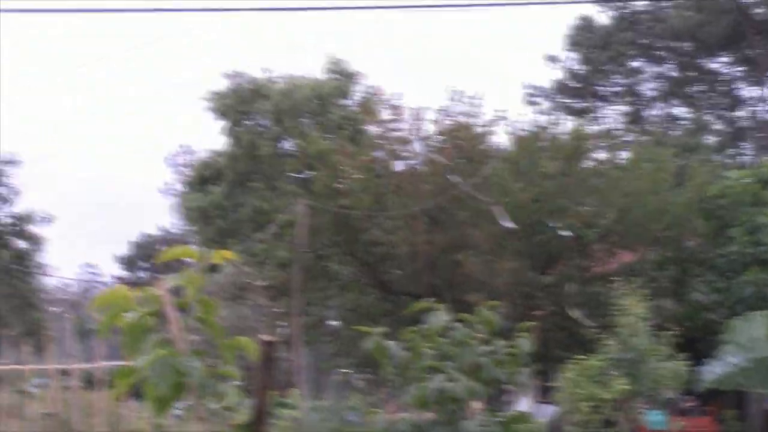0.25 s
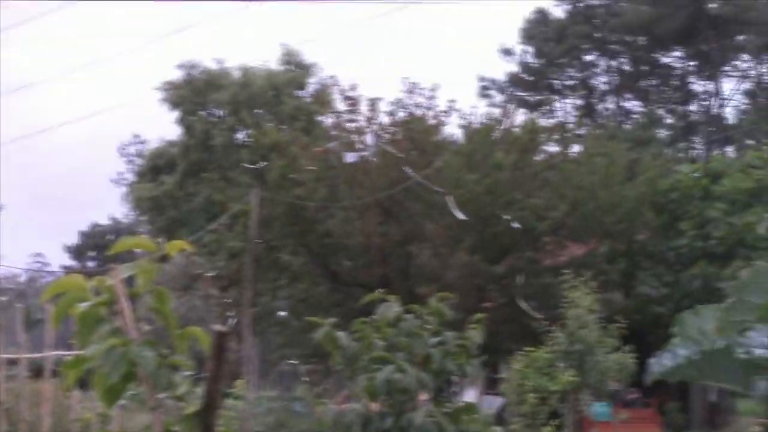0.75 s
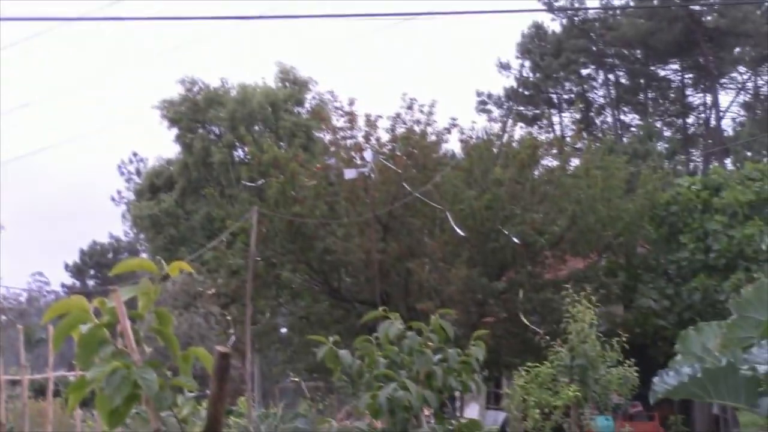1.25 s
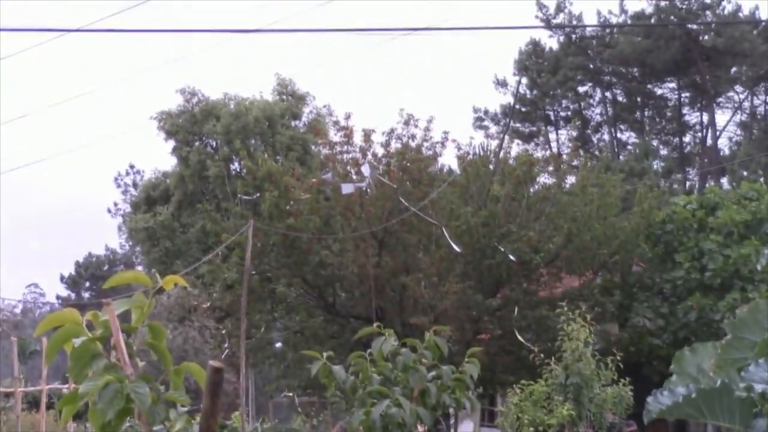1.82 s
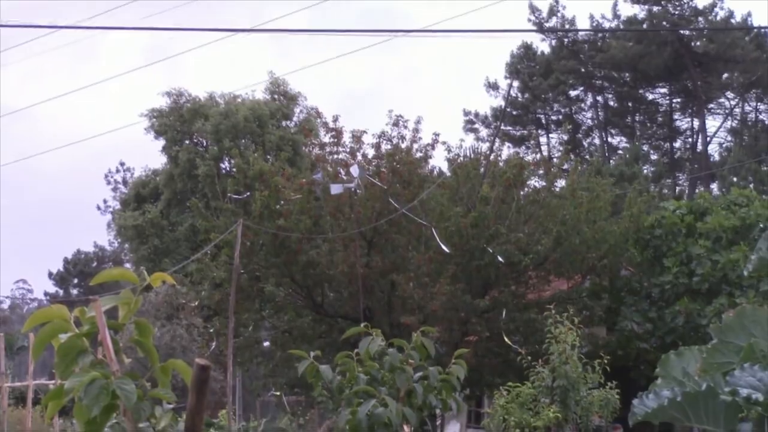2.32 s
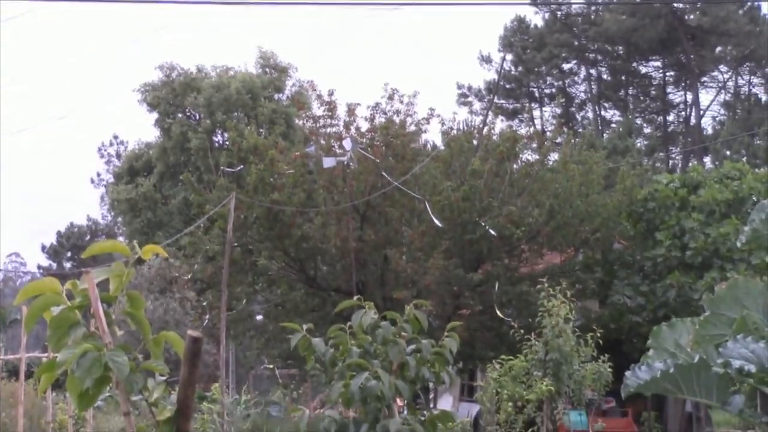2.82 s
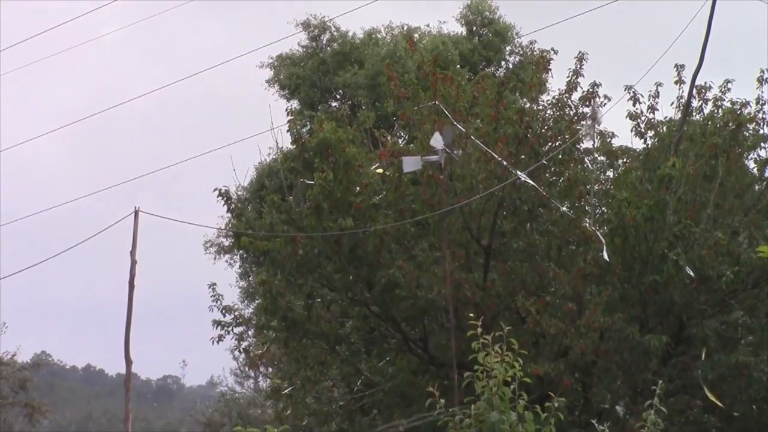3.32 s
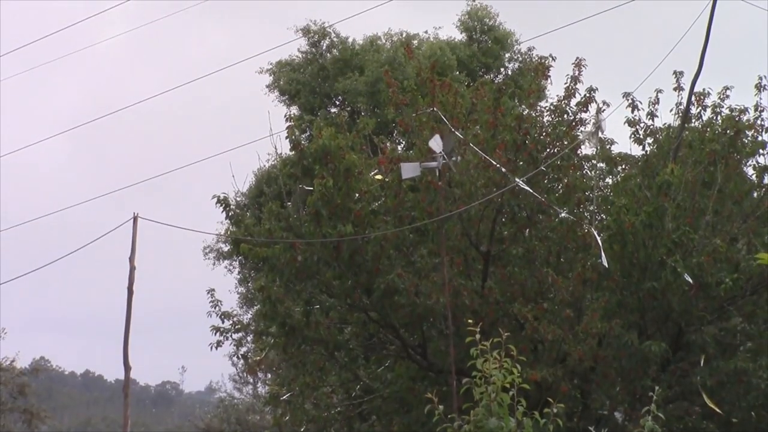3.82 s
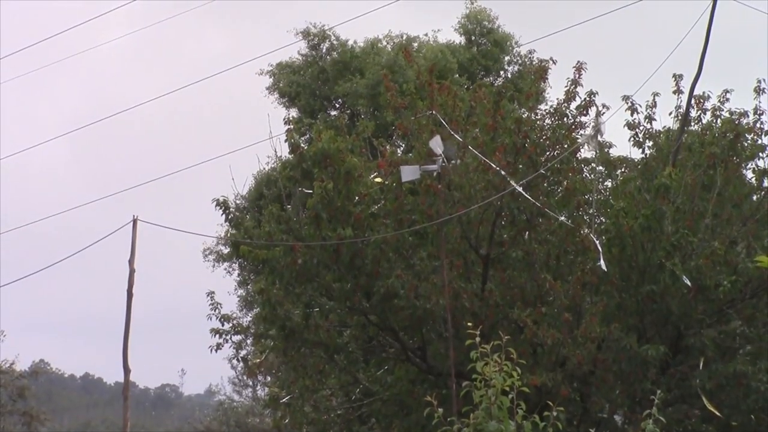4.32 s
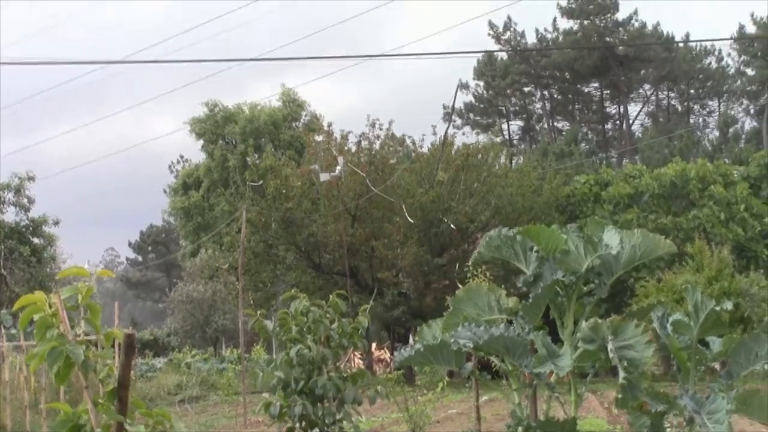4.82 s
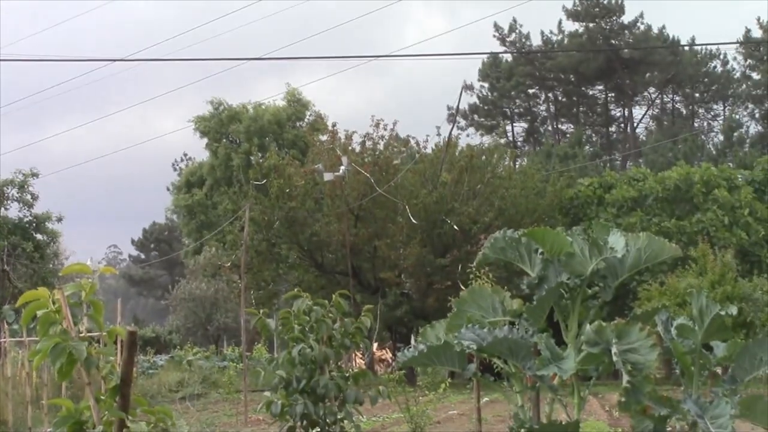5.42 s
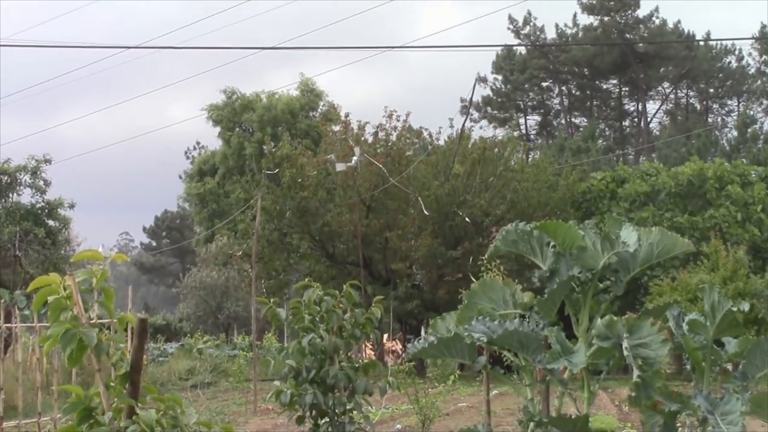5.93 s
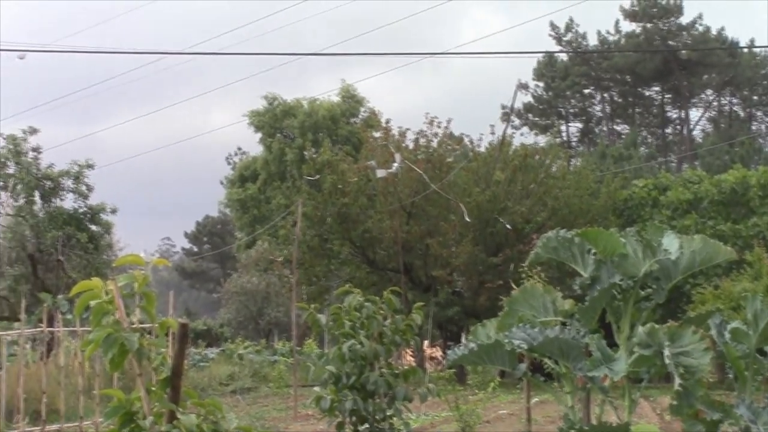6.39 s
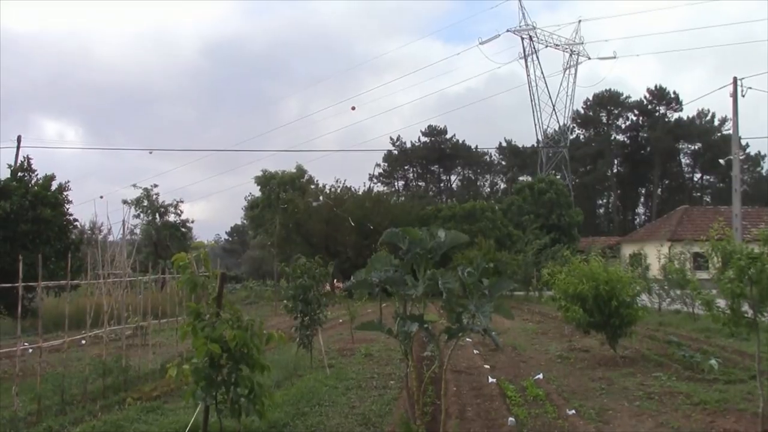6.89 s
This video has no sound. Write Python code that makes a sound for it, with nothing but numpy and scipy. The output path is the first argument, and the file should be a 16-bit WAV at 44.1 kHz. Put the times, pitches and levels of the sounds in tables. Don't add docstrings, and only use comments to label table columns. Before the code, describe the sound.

Four ringing bangs of scrap on a metal drum, cut between garden viewpoints, with faint breeze, foil rustle, chirps, small clinks and a distant hoot.

```python
import sys
import numpy as np
from scipy import signal
from scipy.fft import rfft, irfft
from scipy.io import wavfile
from scipy.ndimage import uniform_filter1d

SR = 44100
rng = np.random.default_rng(int(sys.argv[2]) if len(sys.argv) > 2 else 0)


def persist_wave(psi):
    counts = np.round(np.clip(psi, -1, 1) * 32767).astype(np.int16)
    wavfile.write(sys.argv[1], SR, np.atleast_2d(counts).T)


def nominal_scale(level):
    x = np.asarray(level, float) / 20
    return 10 ** x


N = 315315
T = np.arange(N) / SR


def shape(table, hz):
    table_hz, value = np.transpose(table)[:2]
    return np.interp(np.log(np.maximum(hz, 1)), np.log(table_hz), value)


def add(out, start_s, sound):
    i = int(start_s * SR)
    out[..., i:i + sound.shape[-1]] += sound[..., :N - i]


def fade(t, t60):
    return np.exp(-np.log(1000) * t / t60)


def walk(rate):
    hold = int(SR / rate)
    steps = np.repeat(rng.standard_normal(N // hold + 1), hold)
    return 2 * uniform_filter1d(uniform_filter1d(steps, hold), hold)[:N]


def noise(table, side_table):
    hz = np.arange(N // 2 + 1) * SR / N
    tilt = nominal_scale(shape(table, hz) + np.array([0 * hz, shape(side_table, hz)]))
    x = irfft(rfft(rng.standard_normal((2, N))) * tilt, N)
    return x / np.sqrt(np.mean(x[0] ** 2))


def note(length, from_hz, to_hz, db, rough):
    u = np.linspace(0, 1, int(length * SR))
    smear = uniform_filter1d(rng.standard_normal((2, 8000)), size=40)[:, :len(u)] * 5
    carrier = np.exp(2j * np.pi * np.cumsum(from_hz + (to_hz - from_hz) * u) / SR)
    voice = carrier * (1 - rough + rough * (smear[0] + 1j * smear[1]))
    return nominal_scale(db) * np.sin(np.pi * u) ** 0.42 * np.imag(voice)


def modes(table, t, longest):
    return sum(nominal_scale(db) * np.sin(2 * np.pi * hz * t) * fade(t, min(t60, longest)) for hz, db, t60 in table)


# start_s [s], air level_db [dB]
PLACES = [
    (0, -55.5),
    (2.92, -54.5),
    (4.372, -55),
    (6.622, -46.5),
]
# pitch_hz [Hz], level_db [dB per Hz]
AIR_COLOURS = [
    [(15, -54), (25, -17.5), (164, 0), (221, 2), (260, -4.5), (389, -1.5), (741, -4.5), (1240, -10),
     (1410, -12.5), (2170, -13.5), (3260, -16), (5730, -23), (15500, -38.5)],
    [(15, -60), (25, -17), (253, -3), (433, -11), (469, -1.5), (509, -15.5), (762, -7.5), (4260, -27),
     (6730, -30.5), (15500, -44.5)],
    [(15, -55), (25, -44), (91, -7.5), (221, -5.5), (340, -3.5), (509, -7.5), (666, -5.5), (1530, -15.5),
     (2170, -19.5), (4150, -22), (15500, -43)],
    [(15, -71), (25, -33), (160, -11), (445, -14), (509, -19), (614, -19.5), (997, -19.5), (2010, -33.5),
     (4150, -39), (9300, -51), (15500, -65)],
]
# pitch_hz [Hz], side_minus_mid_db [dB]
AIR_SIDE = [(60, -22), (110, -15), (200, -15), (380, -10.5), (700, -12.5), (1290, -10.5), (2380, -7.5),
            (4400, -11.5), (8120, -10.5), (15000, -13.5)]


def air():
    out = np.zeros((2, N))
    ends = [start for start, _ in PLACES[1:]] + [T[-1] + 1]
    for (start, db), end, colour in zip(PLACES, ends, AIR_COLOURS):
        out += noise(colour, AIR_SIDE) * nominal_scale(db) * ((T >= start) & (T < end))
    return out * nominal_scale(0.26 * walk(1.8) + 0.5 * walk(6.7))


# peak_s [s], rise_s [s], fall_s [s], level_db [dB]
GUSTS = [
    (.4, .22, 0.17, -65),
    (.95, .3, 0.16, -67.5),
    (1.23, 0.057, .05, -66.5),
    (3.03, 0.077, 0.054, -52),
    (4.8, 0.11, .12, -56),
    (5.05, .1, .25, -64),
    (5.55, 0.086, 0.076, -63),
    (6.63, .006, 0.37, -66.5),
]


def breeze():
    out = nominal_scale(-79.5)
    for peak_s, rise_s, fall_s, db in GUSTS:
        width_s = np.where(T < peak_s, rise_s, fall_s)
        out = out + nominal_scale(db) * np.exp(-((T - peak_s) / width_s) ** 2)
    return out


# pitch_hz [Hz], level_db [dB per Hz]
RUSTLE_COLOUR = [(590, -39), (1000, 2), (1120, -19), (1380, -5), (2180, -2.5), (4150, -8), (7360, -10),
                 (15500, -26)]


def rustle():
    crackle = nominal_scale(0.58 * walk(47) + 1.5 * walk(300))
    return noise(RUSTLE_COLOUR, AIR_SIDE) * breeze() * crackle


# start_s [s], length_s [s], from_hz [Hz], to_hz [Hz], level_db [dB]
CHATTER = [
    (0, 0.12, 7260, 7600, -71),
    (.24, .055, 3850, 3770, -68),
    (2.613, .04, 5000, 5200, -67),
    (2.937, .022, 2640, 2470, -56),
    (4.276, .042, 6800, 6860, -71),
    (4.445, 0.017, 4080, 4000, -60),
    (4.83, 0.023, 4130, 3470, -50.5),
    (4.845, .066, 3480, 3150, -53),
    (5.866, 0.044, 3800, 4530, -59),
    (5.898, 0.073, 3950, 2820, -56.5),
]
# start_s [s], length_s [s], from_hz [Hz], to_hz [Hz], level_db [dB]
WHISTLES = [(2.652, .015, 5130, 3600, -60), (2.752, .016, 4100, 4340, -58.5),
            (2.796, .026, 3160, 2900, -56.5), (2.9, .02, 3800, 4400, -60), (3.022, 0.0255, 3850, 4100, -58),
            (3.058, .011, 3800, 3900, -58), (3.49, 0.044, 8400, 8600, -74), (3.545, .07, 7800, 7000, -69),
            (4.245, .04, 6620, 6630, -66.5), (4.382, .14, 5370, 5300, -71), (4.4, 0.02, 1470, 1490, -59),
            (4.531, .045, 3980, 4730, -61), (4.642, 0.104, 4320, 4220, -58.5),
            (6.657, .011, 2890, 2900, -61.5), (6.748, .03, 3850, 4500, -63), (6.832, .016, 5700, 6400, -61),
            (6.846, .016, 3920, 4900, -55)]


def birds():
    out = np.zeros(N)
    for calls, rough in (WHISTLES, 0.15), (CHATTER, 0.65):
        for start_s, *call in calls:
            add(out, start_s, np.sqrt(2) * note(*call, rough))
    for k in range(6):
        trill_note = note(0.012, 3700, 3240, db=-59 + 0.7 * k, rough=0.15)
        add(out, 2.688 + 0.0312 * k, np.sqrt(2) * trill_note)
    return out


def through_leaves(x, db, t60):
    t = np.arange(SR // 4) / SR
    echoes = rng.standard_normal(len(t)) * fade(t, t60)
    return x + nominal_scale(db) * signal.fftconvolve(x, echoes / np.linalg.norm(echoes))[:N]


# first_s [s], last_s [s], about every_s [s], level_db [dB]
BOUTS = [(.041, .108, .07, -75), (.405, .492, .085, -74), (.854, .945, .09, -72), (1.04, 1.192, .078, -70),
         (1.304, 1.598, .074, -78), (1.709, 1.942, .077, -71), (2.075, 2.236, .081, -72),
         (2.318, 2.552, .078, -72.5), (2.688, 2.86, .086, -73), (2.98, 3.077, .09, -68),
         (3.458, 3.59, .065, -69), (3.655, 3.79, .065, -72), (3.84, 4.043, .067, -67)]


def crickets():
    out, pitch_hz = np.zeros(N), 5570
    for first, last, every, db in BOUTS:
        for start_s in np.linspace(first, last, 1 + round((last - first) / every)):
            chirp_db = db + 1.2 * rng.standard_normal()
            add(out, start_s, np.sqrt(2) * note(0.05, pitch_hz, pitch_hz, chirp_db, rough=0.13))
    chorus = nominal_scale(-85.5 + 2.7 * walk(25)) * (T < PLACES[2][0])
    return out + chorus * np.sin(2 * np.pi * np.cumsum(pitch_hz + 25 * walk(73)) / SR)


# time_s [s], level_db [dB]
TOAD = [
    (0, -64),
    (.9, -64),
    (1.5, -62),
    (2.0, -57.5),
    (2.6, -58),
    (2.92, -62),
]


def toad():
    out, pitch_hz = np.zeros(N), 2200
    loud_db = np.interp(T, *np.transpose(TOAD))
    for group_s in np.arange(0.045, TOAD[-1][0] - 0.1, 0.15):
        for pulse_s in group_s + 0.0334 * np.arange(4):
            db = loud_db[int(pulse_s * SR)] + 1.5 * rng.standard_normal() + 3.5
            add(out, pulse_s - 0.004, note(0.006, pitch_hz, pitch_hz, db, rough=0.1))
    return out


def swell(t, peak_s, sharp):
    u = np.maximum(t, 0) / peak_s
    power = (u * np.exp(1 - u)) ** sharp
    return power / power.sum()


def stored(power, t60):
    keep = fade(2 / SR, t60)
    return signal.lfilter([1 - keep], [1, -keep], power)


COLOUR_HZ = [60, 95, 160, 250, 420, 700, 1100, 1600, 2300, 3300, 4700, 7500, 11000, 15500]
# pitch_hz [Hz], side_minus_mid_db [dB]
BANG_SIDE = [(60, -33.5), (110, -46.5), (200, -46.5), (380, -49), (700, -44.5), (1290, -29), (2380, -23),
             (4400, -17.5), (8120, -26.5), (15000, -24)]
# pitch_hz [Hz], t60_s [s]
RING = [(60, 0.69), (250, 0.68), (1000, 0.86), (2200, 0.6), (4500, 0.47), (9000, 0.26)]
# pitch_hz [Hz], level_db [dB]
SHUDDER = [(100, -15.5), (400, -16.5), (1200, -3), (4000, 7.5), (10000, 3.5)]
# pitch_hz [Hz], level_db [dB]
SCATTER = [(80, -12.5), (500, -19), (2000, -26), (6000, -27)]


def bang(db, peak_s, shudder_db, ring_factor, rebound, colour, ridges, panels):
    t = np.arange(2 ** 16) / SR
    hz = np.arange(len(t) // 2 + 1) * SR / len(t)
    even = nominal_scale(shape(np.c_[COLOUR_HZ, colour], hz))
    peaks = sum(nominal_scale(level_db) / (1 + (2 * (hz - f) / width) ** 2) for f, width, level_db in ridges)
    colours = [even, even * nominal_scale(shape(BANG_SIDE, hz)), nominal_scale(-1) * peaks]
    crowd = rfft(rng.standard_normal((3, len(t)))) * colours
    shudder = swell(t, peak_s, sharp=3.5)
    bounce_s, bounce_db = rebound
    out = 0
    for centre in 63 * 2 ** (np.arange(25) / 3):
        thirds_away = 3 * np.log2(np.maximum(hz, 1) / centre)
        band = np.cos(np.clip(thirds_away, -1, 1) * np.pi / 2) ** 2
        rise_s = 0.004 + 0.12 / centre
        blow = swell(t, rise_s, sharp=0.62)
        bounce = nominal_scale(2 * bounce_db) * swell(t - bounce_s, 3 * rise_s, sharp=0.98)
        fed = blow + bounce + nominal_scale(2 * (shudder_db + shape(SHUDDER, centre))) * shudder
        flutter_db = -0.5 * np.repeat(rng.standard_normal(64), len(t) // 64)
        fed *= nominal_scale(2 * flutter_db) / fed.sum()
        t60 = ring_factor * shape(RING, centre)
        ring = stored(fed, t60)
        scatter_t60 = 2.53
        tail = nominal_scale(2 * shape(SCATTER, centre)) * stored(ring, scatter_t60) * scatter_t60
        ridge_ring = stored(fed, 0.99 * t60)
        clumps = nominal_scale(1.8 * np.interp(t, np.arange(100) * 0.015, rng.standard_normal(100)))
        mid, side, ridge = irfft(crowd * band, len(t)) * clumps
        out = out + np.sqrt(ring + tail) * [mid, side] + [np.sqrt(ridge_ring) * ridge, 0 * t]
    jolts = rng.standard_normal(len(t)) * np.sqrt(swell(t, 0.025, sharp=0.84) + shudder)
    clear = signal.fftconvolve(jolts, modes(panels, t, longest=1.57))[:len(t)]
    out[0] += nominal_scale(-13.5) * clear * np.linalg.norm(out[0]) / np.linalg.norm(clear)
    wavefront = modes([(480, -3.0, 0.014), (1300, -18.5, 0.004)], t, longest=0.02)
    out[0] -= nominal_scale(-35.0) * np.linalg.norm(out[0]) * wavefront
    out = signal.sosfilt(signal.butter(4, 58, "high", fs=SR, output="sos"), out)
    out = out * np.minimum((t[-1] - t) / 0.41, 1)
    return nominal_scale(db) * out / np.sqrt(np.sum(out[0] ** 2) / (SR / 2))


# start_s [s], energy_db [dB], shudder peak_s after the blow [s], shudder_db against it [dB], ring_factor [ratio]
BANGS = [
    (0.5796, -25.5, 0.04, 11.5, 0.98),
    (3.141, -18, 0.036, 7, 1.11),
    (4.9473, -20.5, 0.033, 7, 1.01),
    (6.862, -19.5, 0.048, 8.5, 0.81),
]
# after_s [s], level_db against the blow [dB]
REBOUNDS = [
    (0.031, -12),
    (0.14, -4),
    (0.15, -8.5),
    (0.066, -22),
]
BANG_COLOURS = [
    [-25, -22, -16.5, -10, -9, -9, -14, -10, -14, -18, -32.5, -44.5, -54, -76],
    [-19.5, -16, -28, -4, -13.5, -5.5, -15, -8.5, -8, -12, -23, -32.5, -44, -75.5],
    [-21, -15.5, -15.5, -9.5, -7, -7.5, -8, -9, -7, -16.5, -24.5, -31.5, -46.5, -69.5],
    [-24, -13, -13, -16.5, -13, -7.5, -9.5, -10, -7.5, -15, -24, -33.5, -46.5, -71],
]
# pitch_hz [Hz], width_hz [Hz], level_db [dB per Hz]
RIDGES = [
    [(252.5, 32, -2), (421, 53, 4.5), (731, 16, 1), (1014, 30, -6.5), (1140, 20, -6.5), (1350, 30, -7.5),
     (1455, 26, -1.5), (1620, 34, -2), (2146, 19, -3), (2360, 22, -11), (2800, 27, -7), (3220, 19, -20)],
    [(254.8, 15.6, 2.5), (415.6, 35, 3.5), (694, 60, 0.5), (1045, 86, -6), (1400, 98, -2.5),
     (2090, 300, -8), (2437, 72, -2.5), (2856, 110, -4.5), (3480, 89, -10.5), (3920, 45, -12.5)],
    [(412, 82, 0), (610, 35, 1.5), (900, 59, -3.5), (1490, 34, -1.5), (1702, 38, -2), (2087, 93, -3)],
    [(215.6, 27, -6.5), (432, 95, -0.5), (595, 22, -3.5), (1330, 19, -6.5), (1625, 210, -4),
     (2116, 44, 0.5)],
]
# pitch_hz [Hz], level_db [dB], t60_s [s]
PANELS = [
    [(263.6, -2, 1.16), (416.6, 0.5, 1.3), (1715, -1, 0.68)],
    [(261.8, -2, 1.7), (387, 7, 0.46), (427, -0.5, 0.63), (714, 3.5, 0.64)],
    [(96, -5, 1.35), (381, 4, .4), (425, 6, 1.1), (467, -1.5, 1.24)],
    [(396, -2, 0.67), (608, 1, 0.36)],
]


def drum_bangs():
    out = np.zeros((2, N))
    leaves = [start for start, _ in PLACES[1:]] + [T[-1]]
    for (start_s, *blow), leave_s, *drum in zip(BANGS, leaves, REBOUNDS, BANG_COLOURS, RIDGES, PANELS):
        add(out, start_s, bang(*blow, *drum)[:, :int((leave_s - start_s) * SR)])
    return out


def burst(hz, width, t60):
    t = np.arange(SR // 4) / SR
    edges = np.clip([hz - width / 2, hz + width / 2], 100, 15500)
    spray = rng.standard_normal(len(t)) * fade(t, t60)
    x = signal.sosfilt(signal.butter(2, edges, "band", fs=SR, output="sos"), spray)
    return x / np.max(np.abs(x))


# start_s [s], level_db [dB], pitch_hz [Hz], width_hz [Hz]
TICKS = [
    (1.77, -56, 7950, 6000),
    (2.5515, -52, 8500, 8000),
    (2.66, -58, 7000, 5000),
    (3.7295, -50, 8500, 8000),
    (4.3, -49, 2200, 1200),
    (4.729, -46, 2500, 2000),
    (4.8274, -40, 4500, 7000),
]
# start_s [s], level_db [dB]
CLINKS = [
    (3.614, -39),
    (3.888, -47.5),
]
# pitch_hz [Hz], level_db [dB], t60_s [s]
STRIPS = [
    [(3630, 2.5, .45), (4400, -10.5, .8), (5400, -11, .8), (6700, -7, 0.37), (7214, -2, .2),
     (7515, -8, .25), (8650, -3, .16), (9900, -12, .23), (10340, -16, .3), (11100, -14, .15)],
    [(4850, -7, .14), (5250, -8, .12), (5835, -9, .3), (7171, -8, .2), (8300, -4, .08), (8613, -5, .25),
     (9448, -4, .12), (10200, -8, .12), (11150, -14, .17), (12460, -18, .29)],
]


def small_metal():
    out, t = np.zeros(N), np.arange(SR // 4) / SR
    for start_s, db, hz, width in TICKS:
        add(out, start_s, nominal_scale(db) * burst(hz, width, t60=0.022))
    for (start_s, db), strip in zip(CLINKS, STRIPS):
        quiver = nominal_scale(2 * walk(260)[:len(t)]) * np.minimum(t / 0.001, 1)
        ring = modes(strip, t, longest=0.8) * quiver * np.minimum((t[-1] - t) / 0.1, 1)
        add(out, start_s, nominal_scale(db) * ring / np.max(np.abs(ring)))
        add(out, start_s, nominal_scale(db - 6.5) * burst(hz=8800, width=5000, t60=0.2))
    return out


# start_s [s], level_db [dB]
KNOCK = (4.779, -35)
# pitch_hz [Hz], level_db [dB], t60_s [s]
KNOCK_MODES = [
    (424, -1, 0.033),
    (800, 3, .02),
    (1340, 4, .018),
    (2100, -8, .012),
]


def wooden_knock():
    out, t = np.zeros(N), np.arange(SR // 4) / SR
    start_s, db = KNOCK
    add(out, start_s, nominal_scale(db) * modes(KNOCK_MODES, t, longest=0.05) * np.minimum(t / 0.0015, 1) / 2)
    return out


def hoot():
    db = -41.5 - 70 * np.maximum(T - 6.86, 0)
    gate = np.clip((T - PLACES[-1][0]) / 0.003 + 1, 0, 1)
    return np.sqrt(2) * gate * nominal_scale(db + 1.0 * walk(30)) * np.sin(2 * np.pi * 514.3 * T)


def scene():
    mid, side = air() + rustle() + drum_bangs()
    creatures = through_leaves(birds(), db=-3.5, t60=0.12) + crickets() + toad()
    mid = mid + creatures + small_metal() + wooden_knock() + hoot()
    side = side + 0.14 * creatures
    return np.array([mid + side, mid - side])


def roll_off(x):
    return signal.sosfilt(signal.butter(12, 15660, fs=SR, output="sos"), x)


def record(dry):
    heard = signal.sosfilt(signal.butter(2, 36, "high", fs=SR, output="sos"), dry)
    return roll_off(np.tanh(1.045 * heard) / 1.137)


dry = scene()
out = record(dry)
persist_wave(out)
```